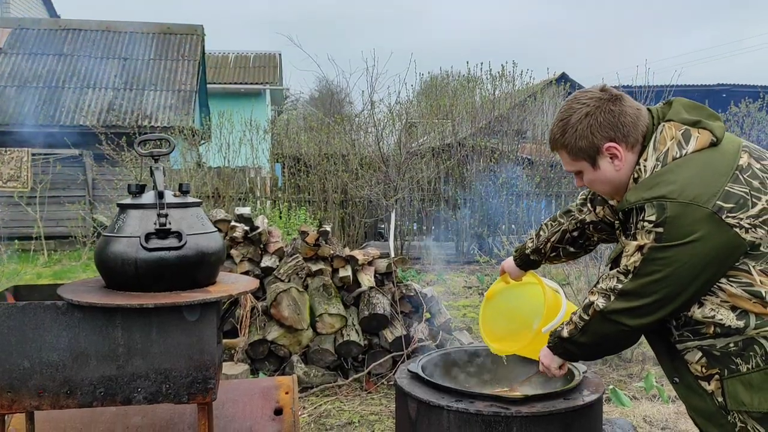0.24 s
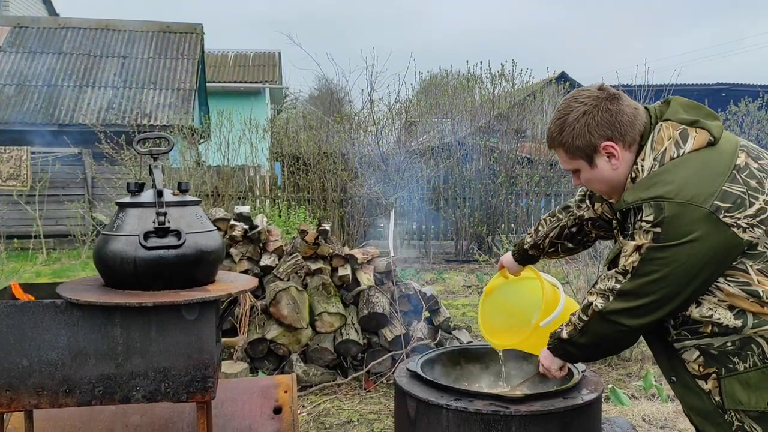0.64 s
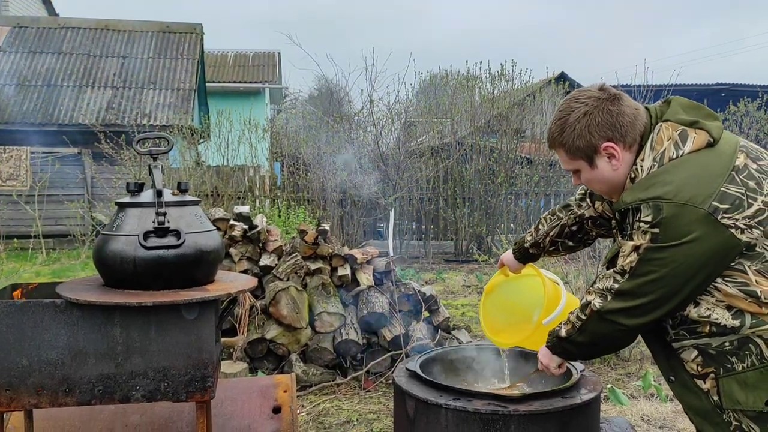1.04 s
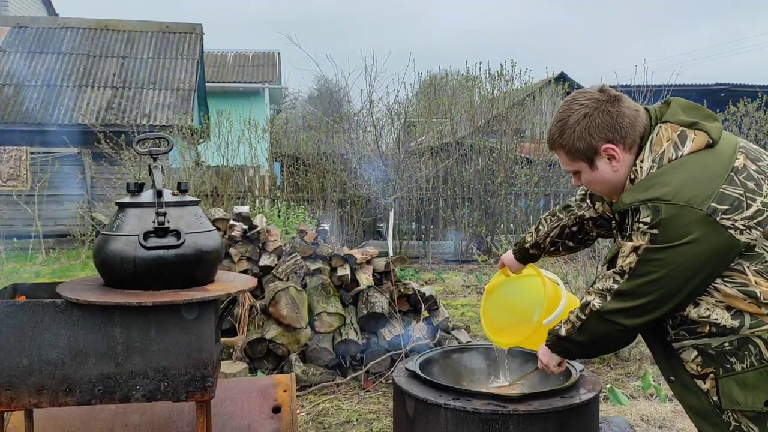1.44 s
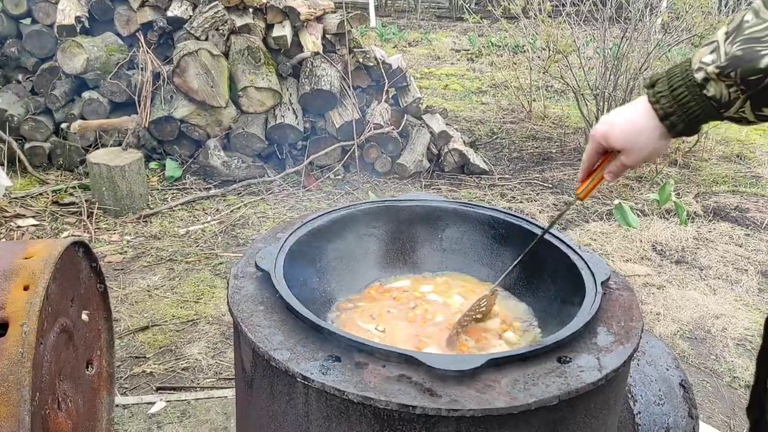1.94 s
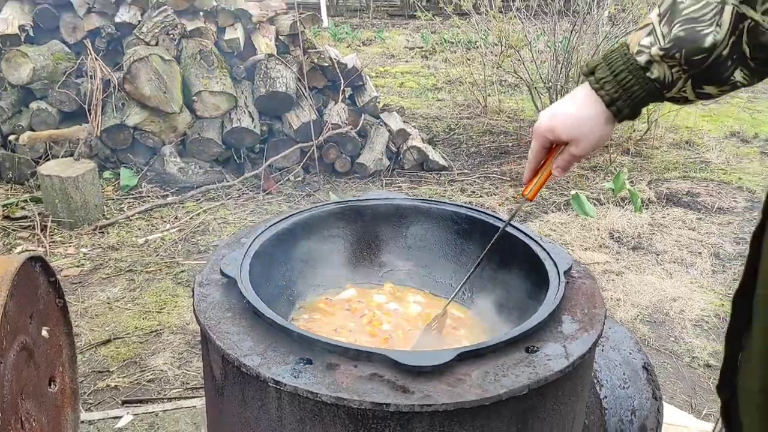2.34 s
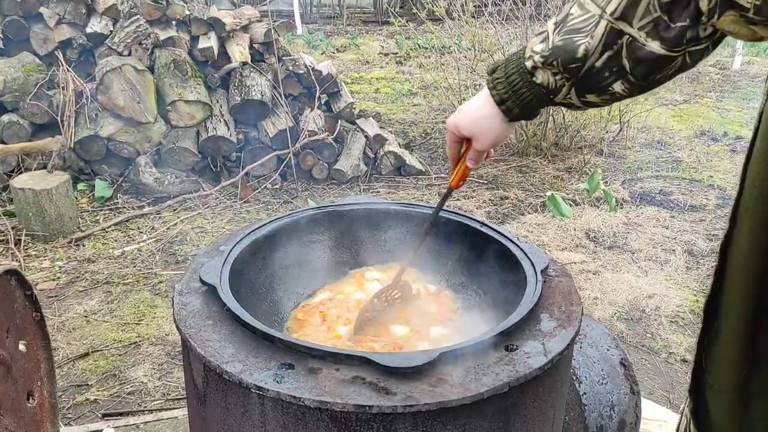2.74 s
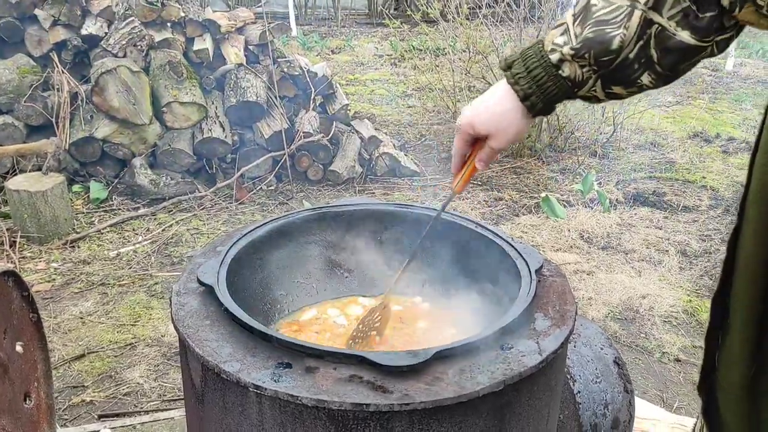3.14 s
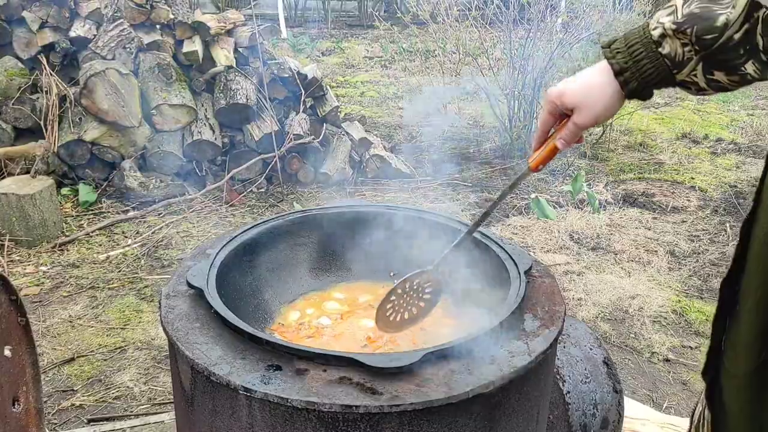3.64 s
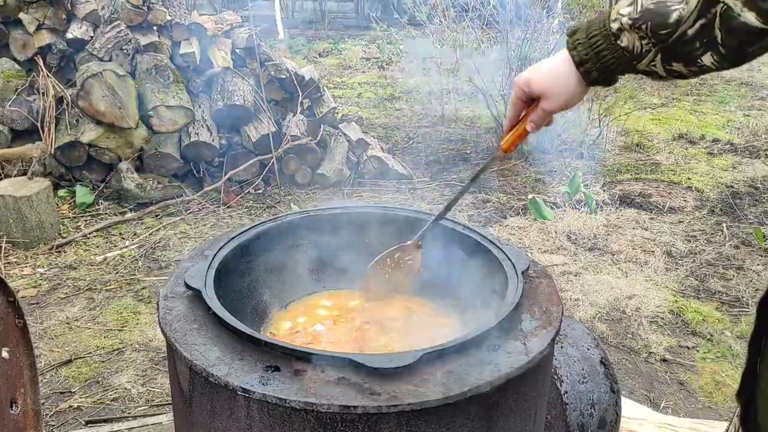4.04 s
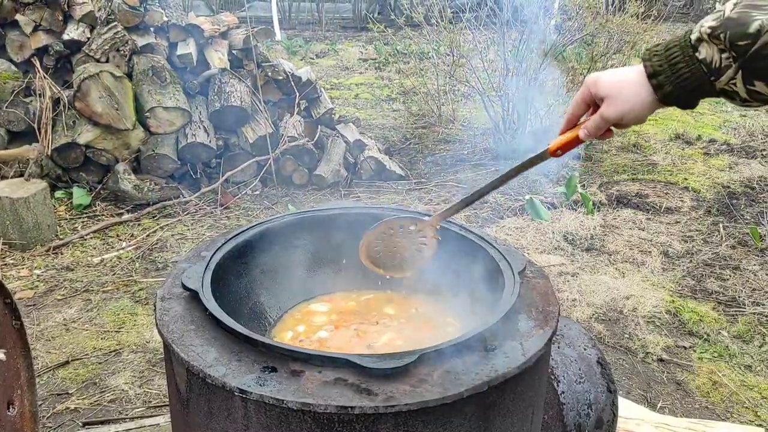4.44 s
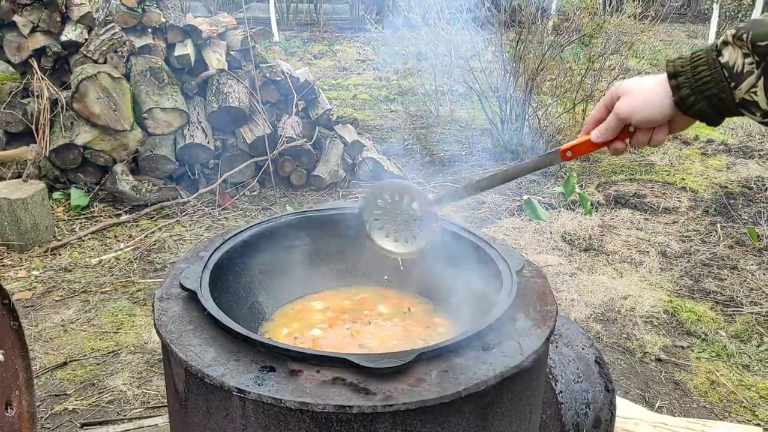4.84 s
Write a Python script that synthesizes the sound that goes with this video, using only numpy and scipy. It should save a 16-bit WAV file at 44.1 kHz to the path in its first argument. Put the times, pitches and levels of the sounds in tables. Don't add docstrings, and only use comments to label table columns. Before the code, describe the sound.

Outdoors, water poured into a hot cast-iron pot sizzles thinly at a distance, with scattered spits and low wind buffeting the two microphone ports. At about 1.7 seconds a tiny silent gap and a soft thud mark a cut. The pot is now close: hiss and crackle swell, with hard, bright spits. Near 4.2 seconds the case is knocked; the sizzle eases as a skimmer is lifted, with little plops.

```python
import sys
import numpy as np
from scipy import signal
from scipy.fft import rfft, irfft
from scipy.io import wavfile
from scipy.ndimage import uniform_filter1d, map_coordinates

SR = 44100
rng = np.random.default_rng(int(sys.argv[2]) if len(sys.argv) > 2 else 0)


def boost(x):
    u = np.asarray(x, float) / 20
    return 10 ** u


def materialize(psi):
    bounded = np.clip(np.atleast_2d(psi).T, -1, 1)
    quanta = np.round(bounded * 32767).astype(np.int16)
    wavfile.write(sys.argv[1], SR, quanta)


N = 225218
TIME = np.arange(N) / SR
CUT, RESUME = 1.7145, 1.7305


def boil():
    # start_s, sizzle_db
    far_boil = [(0, -39), (1.71, -39.5)]
    # start_s, sizzle_db
    near_boil = [(1.73, -42.5), (2.0, -29), (2.15, -27.5), (2.21, -28), (2.62, -31), (2.91, -26.5),
                 (3.0, -28), (3.33, -28), (3.39, -32), (3.63, -27.5), (3.9, -26.5), (4.02, -28.5),
                 (4.22, -30), (4.31, -33), (5.0, -32), (5.11, -39)]
    far_db = np.interp(TIME, *np.transpose(far_boil))
    near_db = np.interp(TIME, *np.transpose(near_boil))
    vigour_db = np.where(TIME < CUT, far_db, near_db)
    level_db = vigour_db + 0.75 * wobble(12)

    quick_db = level_db - uniform_filter1d(level_db, int(0.54 * SR))
    gurgle_db = np.where(TIME < CUT, -7.5, -12.5) - 0.94 * quick_db * (TIME > 2) + 0.2 * wobble(9)
    spray_db = -11.5 + 0.6 * wobble(8.1)
    pan_db = np.where(TIME < CUT, -5, -4) + 1.1 * wobble(8)

    crackle = fizz(count=20000, spread_db=4.5, places=1.2, clump_db=1)
    hiss = steam(alike=0.95, patchy_db=2.0)
    sizzle = unit(boost(-6.5) * crackle + boost(-3.5) * hiss)
    low, middle, _ = bands(sizzle, low_hz=3900, high_hz=9150)
    fine_spray = unit(boost(-7.5) * crackle + boost(-7) * hiss)
    high = bands(fine_spray, low_hz=3600, high_hz=9180)[2]
    bubbling = fizz(count=9000, spread_db=3.5, places=1.5, clump_db=2.0)
    gurgle = bands(bubbling, low_hz=3180, high_hz=9000)[0]
    bed = boost(gurgle_db + 10.5) * (low + boost(-1.5) * gurgle) + middle + boost(spray_db + 14) * high
    side = np.array([[1], [-1]])
    bed *= boost(level_db + 4 + side * pan_db / 2)

    s, db, dull_db, spit_pan_db = spits(vigour_db)
    lead = np.where(s < CUT, 2, -3) + rng.normal(0, 2.7, len(s))

    def spit_bands(size):
        clicks = bursts(s - 0.0004, size, spit_pan_db + 3, lead, echo_db=-7, echo_s=0.002)
        return bands(clicks, low_hz=3600, high_hz=9800)

    _, sharp, sharpest = spit_bands(boost(db + 4.0))
    dull = spit_bands(boost(db + dull_db + 13))[0]
    return port_colours(bed + sharp + boost(-3.5) * sharpest + dull)


def spits(level_db):
    # start_s, peak_db, dull_part_db, left_minus_right_db
    far_spits = [(0.2498, -11, -3, -11), (.315, -20, -17, -7), (.328, -14, -22, -11), (.464, -20, -20, -16),
                 (.4861, -17, -25, -14), (.5996, -14.5, -21, -8), (.6375, -8.5, -6, -11),
                 (.7534, -22, 4, -8), (0.8833, -14, -7, -10), (0.9419, -12.5, -19, -10),
                 (.947, -16, -14, -18), (.9515, -21.5, 6, -10.5), (.977, -17, 1, -9),
                 (1.0605, -14.5, -22, -4), (1.0774, -19, -23, -19), (1.0856, -12.5, -27, -13),
                 (1.137, -24.5, 9.5, -8), (1.2626, -19, -23, -17), (1.272, -16, -20, -16),
                 (1.2993, -17, 1, -12), (1.342, -25, -19, -7), (1.353, -13.5, 3, -5),
                 (1.385, -23.5, 11, -5), (1.5582, -22, -12, -2), (1.5968, -10, -16, -10),
                 (1.624, -23, -22, -22)]
    # start_s, peak_db, dull_part_db, left_minus_right_db
    near_spits = [(1.8058, -17.5, -19, 4), (1.916, -11, -26, -11), (1.9318, -15, -2, -14),
                  (2.026, -10, -5, -5), (2.03, -9, -14, -18), (2.084, -.5, -21, -4), (2.088, -9, -6, -1),
                  (2.132, -9, -8, -8), (2.1506, -10, -16, -14), (2.1708, -4.5, -23, 3),
                  (2.2978, -8, -16, -8), (2.447, -21, -40, -4), (2.5658, -8, -14, -11),
                  (2.6792, -11, -3, -11), (2.7137, -7, -41, -4), (2.7176, -4, -22, -5),
                  (2.882, -10, -22, -16), (2.9323, -2.5, -7.5, -17), (3.013, -9.5, -3, -18),
                  (3.0141, -6, -14, 1), (3.0886, -2.5, -6, -8), (3.212, -9, -20, -11),
                  (3.449, -16, -14, -9), (3.519, -11.5, 0, -7), (3.638, -6, -7, -14),
                  (3.882, -7.5, -14, -21), (3.9188, -2.5, -8, -11), (3.9739, -12, -20, -20),
                  (4.0183, -12, -23, -9), (4.086, -10.5, -39, -16)]
    # start_s, peak_db, dull_part_db, left_minus_right_db
    drip_spits = [(4.2063, -7.5, -20, -11), (4.2302, -8.5, -9, -18.5), (4.372, -12.5, -19, -12),
                  (4.456, -19.5, -24.5, 6), (4.495, -14, -22, -2), (4.503, -9, -17, -5),
                  (4.559, -9.5, -4.5, -17), (4.6438, -12, -21, -11), (4.701, -7.5, -2.5, -7),
                  (4.835, -13, 3, -3), (4.9023, -9, -18, -3), (4.9654, -19, -13, -6),
                  (5.086, -15.5, -17, -10)]
    count = 130
    when = rng.random(count) * (N - 1)
    size, dull, side = rng.standard_normal((count, 3)).T
    small_db = level_db[when.astype(int)] + 12 + 2.5 * size
    small = [when / SR, small_db, -12 + 3.2 * dull, -10.5 + 8.9 * side]
    big = np.concatenate([far_spits, near_spits, drip_spits]).T
    return np.hstack([big, small])


def fizz(count, spread_db, places, clump_db):
    when, size, place, sign = rng.random((count, 4)).T
    s = when * N / SR
    lead = np.where(s < CUT, 2, -3) + places * (place - 0.5) * 2
    size = np.sign(sign - 0.5) * boost(-spread_db * np.log(size + 1 / 130))
    crackle = bursts(s, size, 5 * (place - 0.5), lead, echo_db=-1.0, echo_s=0.003)
    clumps_db = clump_db * wobble(45) + 0.78 * clump_db * wobble(11)
    return unit(crackle * boost(clumps_db))


def bursts(s, size, pan_db, lead, echo_db, echo_s):
    draws = rng.random((len(s), 9))
    at = np.round(s * SR).astype(int)
    length = N + 2048
    ports = np.zeros((2, length))
    for port, side in enumerate((1, -1)):
        shift = np.round(lead).astype(int) if port else 0
        start = np.clip(at + shift, 0, N)
        gain = size * boost(side * pan_db / 2)
        ports[port] += np.bincount(start, gain, length)
        for k in range(3):
            delay = draws[:, k] * echo_s * SR + 3.5 * draws[:, 3 + 3 * port + k]
            late = start + np.clip(delay, 1, 2000).astype(int)
            ports[port] += np.bincount(late, gain * boost(echo_db) * (-1) ** k, length)
    return ports[:, :N]


def steam(alike, patchy_db):
    _, _, z = signal.stft(rng.standard_normal((3, N)), nperseg=256)
    patches = uniform_filter1d(rng.standard_normal(z.shape[1:]), size=5, axis=0)
    patches = uniform_filter1d(patches, size=12, axis=1)
    patchy = z * boost(patchy_db * patches / patches.std())
    common, *own = signal.istft(patchy, nperseg=256)[1][:, :N]
    own = np.array(own)
    low = bands(common, low_hz=3500, high_hz=9000)[0]
    own_low = bands(own, low_hz=2800, high_hz=9000)[0]
    apart = own - own_low * np.clip(alike, 0, 1)
    return unit(apart + alike * low)


def port_colours(x):
    # pitch_hz, level_db (per Hz)
    far_left = [(260, -22), (1210, -19.5), (2760, -12.5), (3790, -13.5), (4220, -11.5), (5510, -7),
                (7320, -4), (8350, 0.5), (10340, -10.5), (11370, -10), (11970, -11.5), (13180, -13),
                (15250, -14.5)]
    # pitch_hz, level_db (per Hz)
    far_right = [(260, -42), (600, -35), (2150, -22.5), (4220, -22.5), (6980, 1.5), (8610, -12.5),
                 (9300, -22.5), (10340, -22), (10850, -32), (12400, -29), (13700, -31), (14900, -37),
                 (15250, -60)]
    # pitch_hz, level_db (per Hz)
    near_left = [(170, -24), (1120, -12.5), (1460, -16), (2840, -8), (3800, -14), (4310, -13.5),
                 (5170, -10), (6720, -9.5), (7700, -2.5), (8400, 0.5), (9130, -6.5), (9700, -15.5),
                 (10770, -12), (15250, -14.5)]
    # pitch_hz, level_db (per Hz)
    near_right = [(170, -33), (430, -31), (780, -22), (2240, -16), (3100, -22.5), (6120, -7), (7240, 0.5),
                  (9130, -12.5), (9650, -22), (11200, -23.5), (12490, -27), (13870, -22), (15250, -20.5)]

    def with_ends(points):
        below = [(20, -70), (points[0][0] * 0.94, points[0][1] - 8)]
        return below + list(points) + [(17000, points[-1][1] - 6)]

    far = TIME < CUT
    heard = []
    for port, far_points, near_points in zip(x, (far_left, far_right), (near_left, near_right)):
        from_afar = coloured(port * far, with_ends(far_points))
        heard.append(from_afar + coloured(port * ~far, with_ends(near_points)))
    return np.array(heard)


def plops():
    # start_s, peak_db, pitch_hz
    bubbles = [
        (1.596, -20.5, 2100),
        (1.605, -28, 2930),
        (3.929, -26.5, 870),
        (4.231, -30.5, 850),
        (4.556, -20.5, 2800),
        (4.697, -21, 2200),
        (4.786, -25, 2410),
        (4.823, -31, 1320),
        (4.93, -24, 2320),
        (5.029, -29, 2490),
    ]
    out = np.zeros(N + SR)
    t = np.arange(SR // 40) / SR
    for s, db, hz in bubbles:
        fade = boost(-60 * t * hz / 9) * (1 - np.exp(-t / 0.00062))
        ring = np.sin(2 * np.pi * hz * t * (1 + 12 * t)) * fade
        out[round(s * SR):][:len(t)] += boost(db + 8.0) * ring
    return out[:N]


def wind():
    # pitch_hz, level_db (per Hz)
    buffet_left = [(8, 7.5), (25, -1), (60, -3.5), (170, -13), (270, -24.5), (430, -25), (800, -56),
                   (1500, -124)]
    # pitch_hz, level_db (per Hz)
    buffet_right = [(8, -21), (40, 6), (120, -4), (190, 2.5), (270, -8), (430, -14.5), (800, -48),
                    (1500, -59)]
    # pitch_hz, level_db (per Hz)
    flutter_colour = [(100, -50), (250, 2), (450, 6), (650, -7), (1000, -44), (2000, -84)]
    gust = gusts()
    steady = []
    for colour in (buffet_left, buffet_right):
        rumble = coloured(rng.standard_normal(N), colour)
        lump = unit(boost(4.4 * wobble(40.2)) * rumble)
        steady.append(lump / np.sqrt(uniform_filter1d(lump ** 2, size=3000) + 1e-3))
    flutter = [coloured(rng.standard_normal(N), flutter_colour) for _ in range(2)]
    return gust * steady + boost(13.5) ** 1.04 * gust ** 2.03 * flutter


def gusts():
    # middle_s, peak_db, length_s, left_minus_right_db
    puffs = [(0.034, -39.5, 0.17, 6), (.17, -38, 0.19, -12), (0.259, -28, 0.038, -22), (.39, -47.5, .14, 8),
             (0.503, -35.5, 0.095, -7.5), (0.622, -33.5, 0.029, -5), (0.674, -38, 0.056, 1),
             (0.804, -45.5, 0.14, 6), (0.952, -43.5, 0.16, 8), (1.09, -53, 0.18, 20),
             (1.367, -57, 0.055, 21), (1.482, -52, 0.042, 24), (1.62, -64, .25, 10)]
    s, db, length, pan_db = np.transpose(puffs)[..., None]
    shape_db = db - 5 * (2 * (TIME - s) / length) ** 2
    right = 4 * boost(2 * shape_db) / (1 + boost(2 * pan_db))
    left = right * boost(2 * pan_db)
    return np.sqrt([left.sum(axis=0), right.sum(axis=0)]) * (TIME < CUT)


def handling():
    # start_s, peak_db, pitch_hz, fade_by_60_db_s, sign
    knocks = [
        (1.746, -28, 216, 0.027, -0.82),
        (1.7573, -23, 43.2, 0.059, -0.75),
        (1.759, -49.5, 130, 0.087, -0.81),
        (4.1883, -18, 760, 0.0093, 1),
        (4.19, -11.5, 370, 0.0075, 0.92),
        (4.1935, -24, 212, 0.021, 1),
        (4.202, -21, 134, 0.05, -0.76),
    ]
    # quick_size, quick_s, slow_size, slow_s
    settle = [
        (-.036, 0.085, 0.02, 0.32),
        (-.008, 0.08, 0.011, 0.28),
    ]
    out = np.zeros((2, N))
    for s, db, hz, t60, sign in knocks:
        t = np.maximum(TIME - s, 0)
        out[0] += sign * boost(db - 60 * t / t60) * np.sin(2 * np.pi * hz * t)
    t = np.maximum(TIME - 1.765, 0)
    for port, (quick, quick_s, slow, slow_s) in enumerate(settle):
        drain = quick * np.exp(-t / quick_s) + slow * np.exp(-t / slow_s)
        out[port] += drain * (1 - np.exp(-t / 0.0021))
    return out


def yard():
    # pitch_hz, level_db (per Hz)
    air_colour = [(10, 14.5), (40, -3.5), (90, 3.5), (140, -26), (220, 7.5), (310, 11), (400, 4), (700, 6),
                  (1500, -51), (16000, -65)]
    common, left, right = [coloured(rng.standard_normal(N), air_colour) for _ in range(3)]
    level_db = np.where(TIME < CUT, -66, np.array([[-57], [-61]]))
    swell = boost(2.3 * wobble(12) + level_db)
    return swell * (common + 0.5 * np.array([left, right]))


def unit(x):
    return x / np.sqrt(np.mean(x ** 2, axis=-1, keepdims=True) + 1e-20)


def wobble(rate):
    knots = rng.standard_normal(int(N * rate / SR) + 4)
    return map_coordinates(knots, [np.arange(N) * rate / SR])


def coloured(x, points):
    size = 8192
    hz, db = np.transpose(points)
    gain_db = np.interp(np.log(np.fft.rfftfreq(size, 1 / SR) + 1), np.log(hz), db)
    cepstrum = irfft(np.log(boost(gain_db)))
    cepstrum[1:size // 2] *= 2
    cepstrum[size // 2 + 1:] = 0
    response = irfft(np.exp(rfft(cepstrum)))
    return signal.fftconvolve(x, response / np.linalg.norm(response))[:N]


def bands(x, low_hz, high_hz):
    low = signal.sosfilt(signal.butter(2, low_hz, fs=SR, output="sos"), x)
    high = signal.sosfilt(signal.butter(2, high_hz, "high", fs=SR, output="sos"), x)
    return low, x - low - high, high


def masked(x, points, spare_db, size):
    hz, _, z = signal.stft(x, SR, window="cosine", nperseg=2048)
    bins, frames = np.arange(len(hz)), np.arange(z.shape[2])
    edges = np.arange(0, len(hz), size)
    power = np.add.reduceat(np.abs(z) ** 2, edges, axis=1)[:, bins // size] / size
    treble = uniform_filter1d(power, size=32, axis=1)[:, hz > 4000]
    loudest = uniform_filter1d(treble.max(axis=(0, 1)), size=11)
    mask = loudest * boost(2 * np.interp(hz, *np.transpose(points)))[:, None]
    waver = rng.standard_normal((len(edges) // 3 + 1, z.shape[2] // 2 + 1))
    mask *= boost(2 * 2.2 * waver[bins // (3 * size)][:, frames // 2])
    power = uniform_filter1d(power, size=2, axis=2)
    usual = uniform_filter1d(power, size=64, axis=1)
    kept = power > np.minimum(mask, usual * boost(2 * spare_db))
    return signal.istft(z * kept, SR, window="cosine", nperseg=2048)[1][:, :N]


def opposed(x, centre_hz, width_hz, share):
    total, apart = (x[0] + x[1]) / 2, (x[0] - x[1]) / 2
    peak = signal.iirpeak(centre_hz, centre_hz / width_hz, SR)
    band = signal.filtfilt(*peak, total) * (TIME > CUT)
    return np.array([total - share * band, apart])


def scene():
    gap = np.where((TIME > CUT) & (TIME < RESUME), boost(-25), 1)
    sources = boil() + plops() + wind() + yard()
    return sources * uniform_filter1d(gap, size=40) + handling()


def top_cut(x):
    return signal.sosfilt(signal.butter(12, 15830, fs=SR, output="sos"), x)


def record(dry):
    # pitch_hz, level_db
    case_colour = [(20, 0), (380, 1), (500, -7), (640, 0.5), (15450, -1), (15550, -22), (15850, -36),
                   (15950, -47)]
    # pitch_hz, level_db (under the loudest band)
    port_mask = [(2000, -40), (2900, -22), (3600, -20), (4600, -21), (6000, -19.5), (8500, -22),
                 (9700, -20), (15000, -22.5)]
    # pitch_hz, level_db (under the loudest band)
    sum_mask = [(3000, -40), (3400, -19), (4200, -17.5), (5100, -16.5), (5600, -26), (9300, -26),
                (10000, -20), (15000, -23)]
    heard = np.array([coloured(port, case_colour) for port in dry]) * boost(-1.5)
    heard = heard / (1 + np.abs(heard / 0.9) ** 4) ** (1 / 4)
    heard = masked(heard, port_mask, spare_db=-0.5, size=6)
    pair = opposed(heard, centre_hz=3600, width_hz=500, share=0.3)
    total = masked(pair, sum_mask, spare_db=-0.7, size=8)[0]
    apart = pair[1]
    mix = np.array([total + apart, total - apart])
    return top_cut(mix)


dry = scene()
out = record(dry)
materialize(out)
```